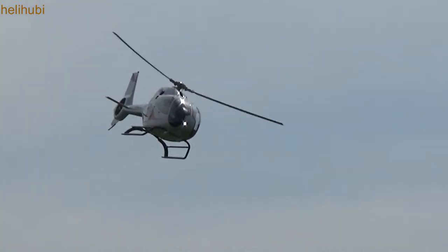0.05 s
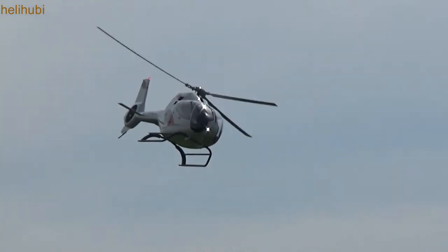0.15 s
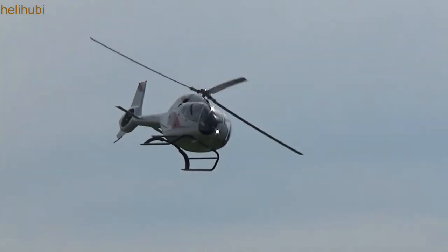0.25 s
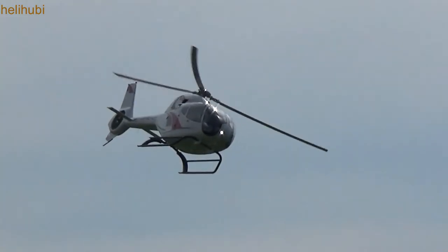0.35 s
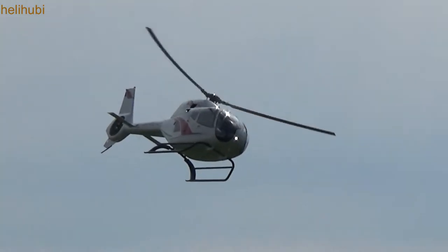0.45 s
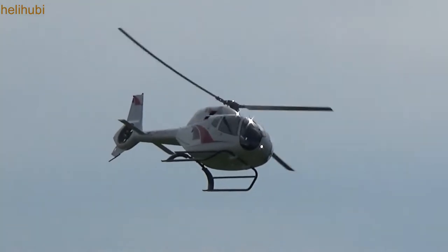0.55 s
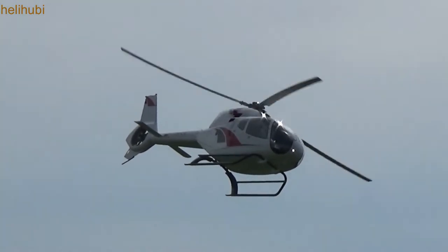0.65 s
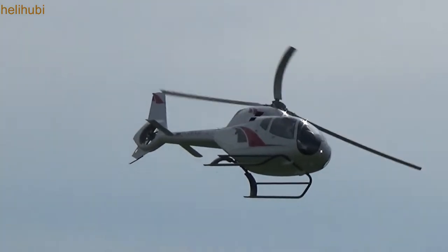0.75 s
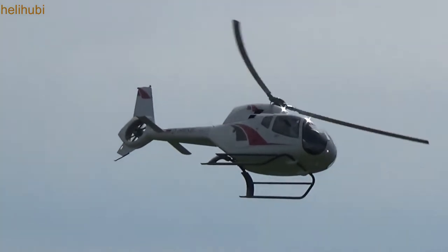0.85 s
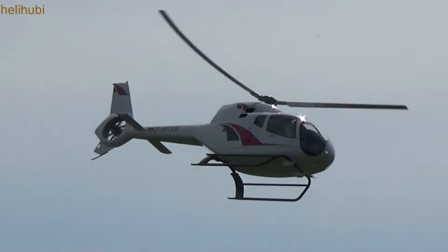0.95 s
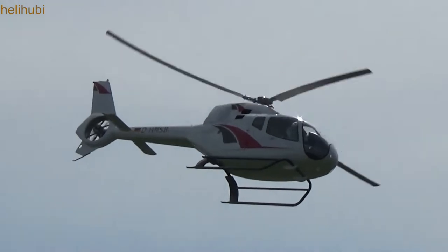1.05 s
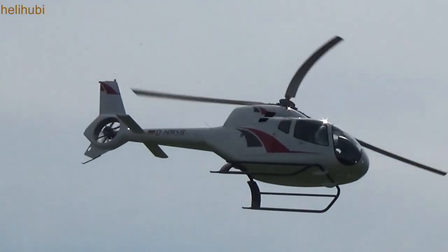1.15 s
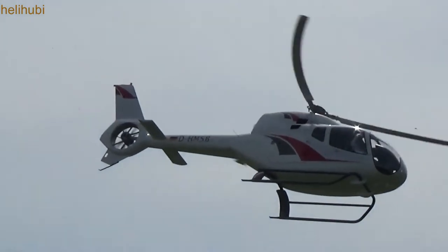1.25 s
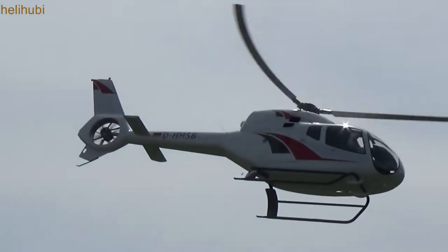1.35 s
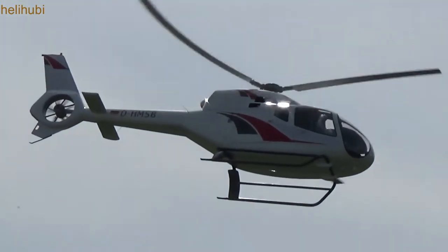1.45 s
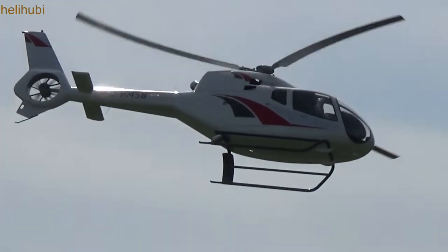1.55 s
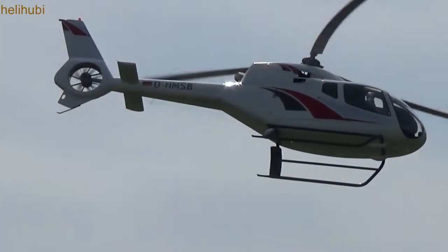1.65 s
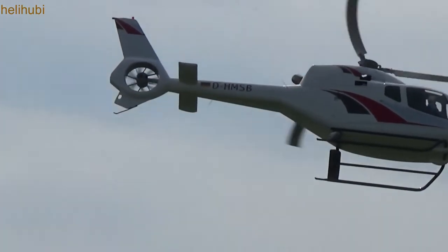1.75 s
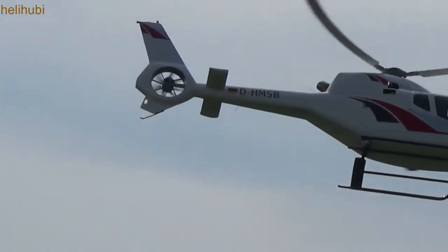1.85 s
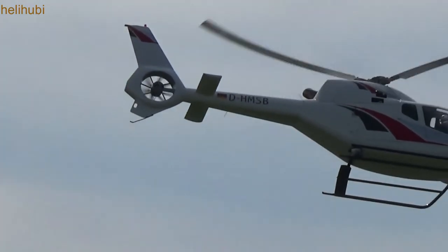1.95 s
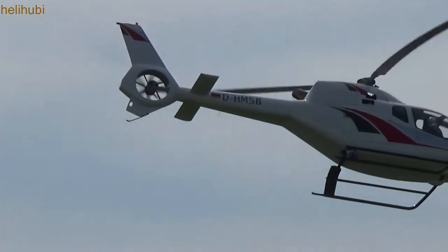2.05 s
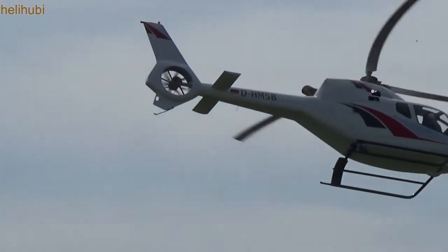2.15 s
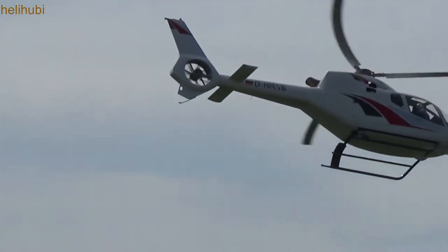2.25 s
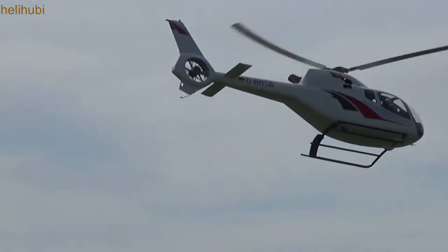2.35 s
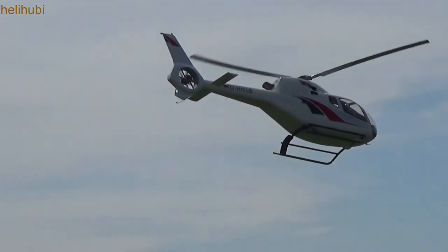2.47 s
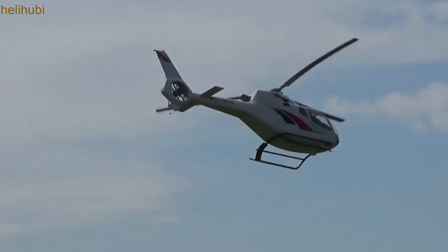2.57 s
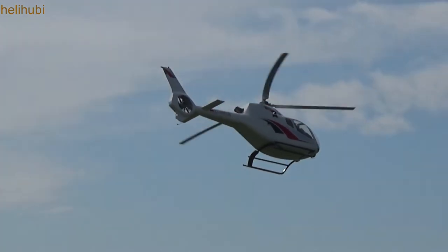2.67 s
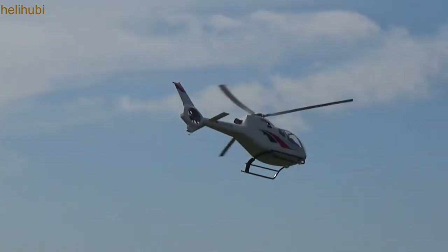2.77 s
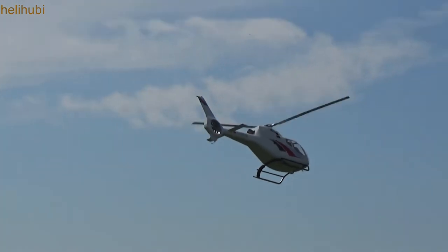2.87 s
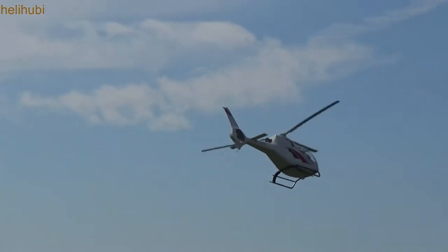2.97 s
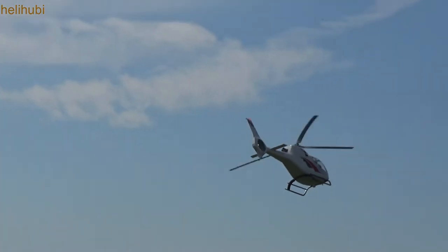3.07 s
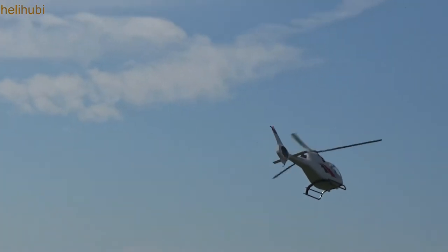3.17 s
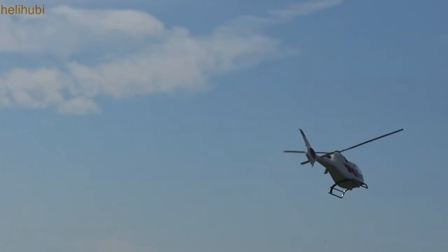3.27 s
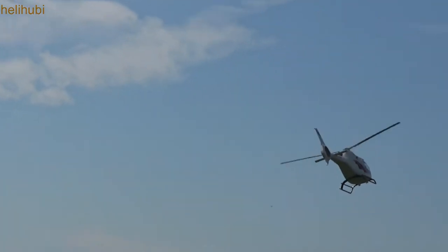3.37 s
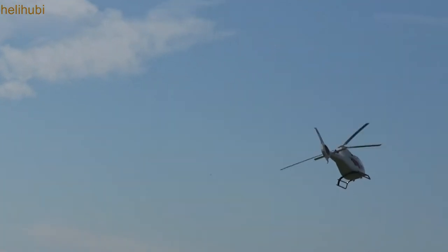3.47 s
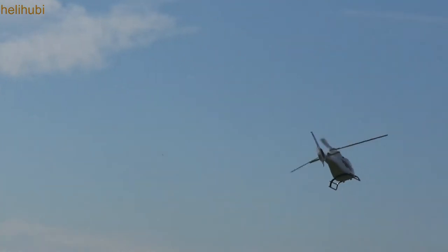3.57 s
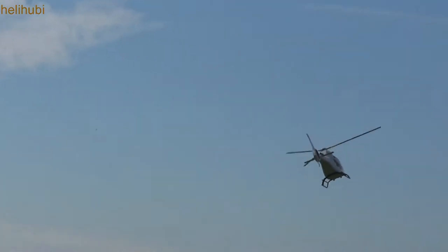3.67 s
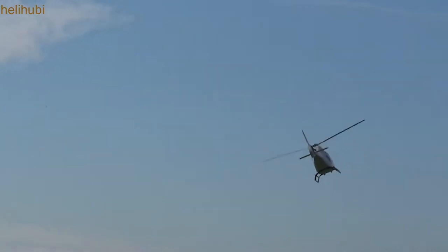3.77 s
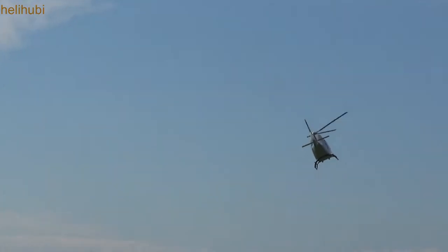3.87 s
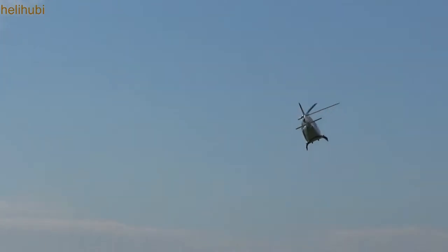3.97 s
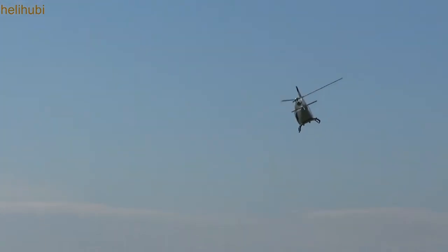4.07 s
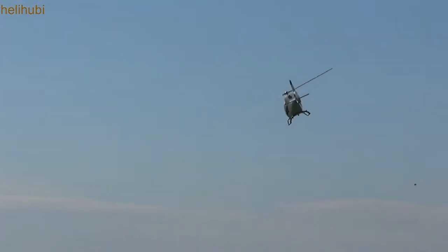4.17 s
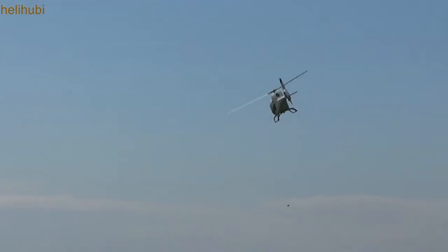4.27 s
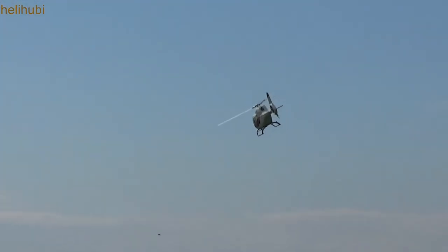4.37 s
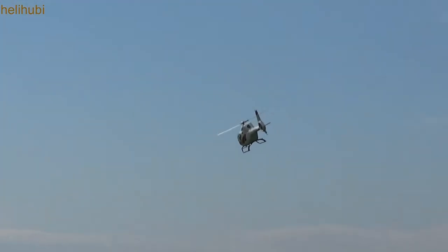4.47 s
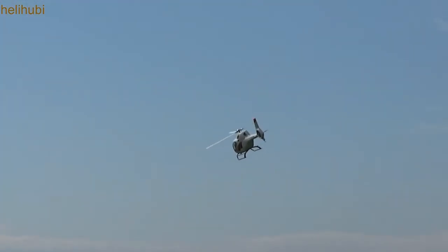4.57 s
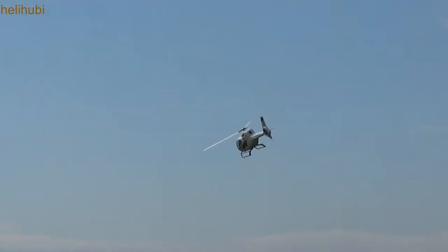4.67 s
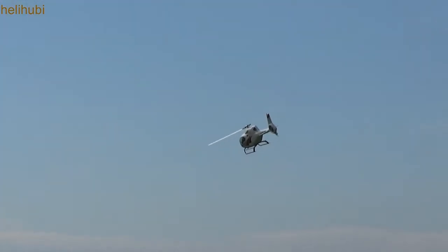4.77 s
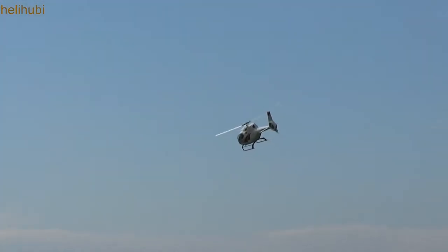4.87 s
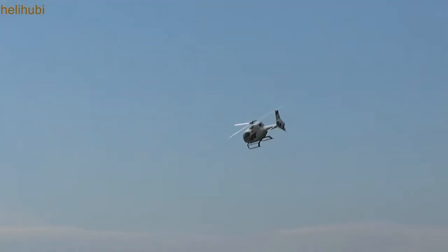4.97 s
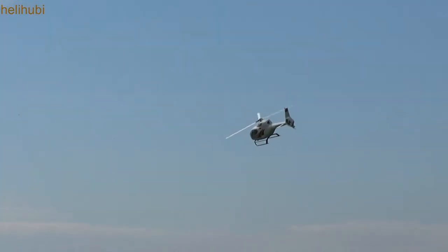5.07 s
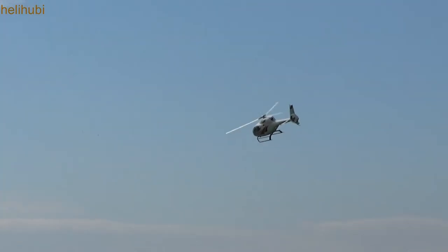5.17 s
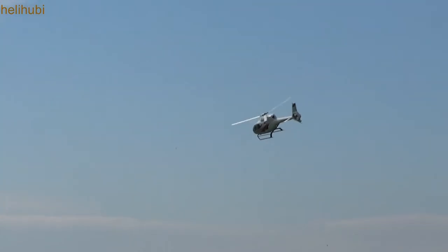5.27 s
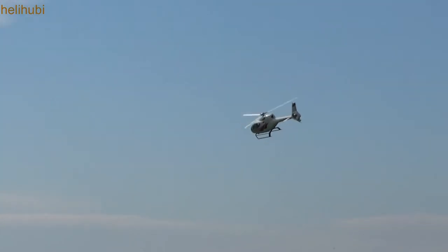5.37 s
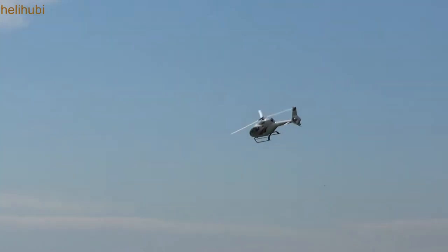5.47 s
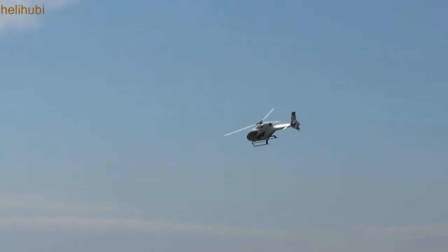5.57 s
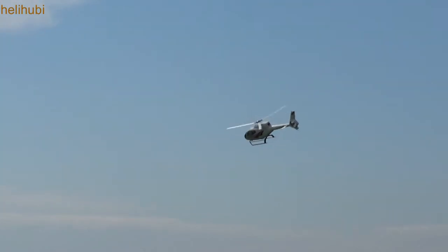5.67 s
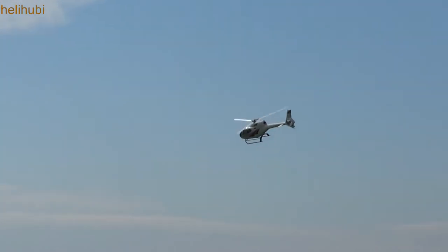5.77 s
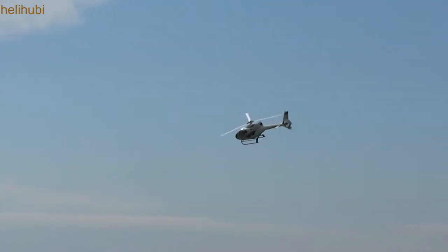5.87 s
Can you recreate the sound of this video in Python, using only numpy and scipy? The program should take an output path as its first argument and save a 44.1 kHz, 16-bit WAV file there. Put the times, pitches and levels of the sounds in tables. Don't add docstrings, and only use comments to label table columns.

```python
import sys
import numpy as np
from scipy import signal
from scipy.fft import rfft, irfft, next_fast_len
from scipy.io import wavfile
from scipy.ndimage import uniform_filter1d, map_coordinates

SR = 44100
rng = np.random.default_rng(int(sys.argv[2]) if len(sys.argv) > 2 else 0)


def transcribe(u):
    v = np.clip(np.atleast_2d(u).T, -1, 1)
    q = np.round(v * 32767).astype(np.int16)
    wavfile.write(sys.argv[1], SR, q)


def linear_from_db(decibels):
    return 10 ** (np.asarray(decibels, float) / 20)


N = 261513

# time in seconds, pitch in Hz.
HEARD_PITCH = [(0.0, 10207), (0.49, 10176), (0.8, 10151), (1.1, 10088), (1.48, 9976), (1.98, 9800),
               (2.35, 9653), (2.72, 9547), (3.1, 9474), (3.5, 9428), (3.8, 9417), (4.69, 9430),
               (5.19, 9454), (5.6, 9494), (5.93, 9505)]
# time in seconds, nearness in dB, intake in sight in dB.
FLIGHT = [(0, -5, 0.5), (.3, -4.5, 1.5), (.56, -1.5, 2), (1.5, 0, 0), (2.0, 1.2, 0), (2.5, 2.04, -3),
          (3.0, 1.15, -2), (3.3, -2.2, 2.5), (3.55, -3, 4.5), (3.7, -0.4, -2), (4.0, 0.8, -12.5),
          (4.35, -1.5, -7.5), (4.6, -6.5, -6.5), (4.85, -10.5, -9), (5.45, -6.5, -8), (5.6, -7.5, -1),
          (5.75, -6, -7.5), (5.93, -6.5, -12)]
# time in seconds, ground share from 0 to 1, blade thump in dB.
GROUND_AND_THUMP = [(0, 0.27, -55), (.7, 0.28, -50.5), (1.3, 0.13, -48.5), (2.1, 0.29, -48.5),
                    (3, 0.3, -45), (3.7, 0.47, -56), (4.4, 0.3, -60), (5, 0.25, -56), (5.93, 0.37, -50)]
# time in seconds, lag in ms.
GROUND_LAG = [(0, 1.8), (.6, 2.15), (1.3, 2.42), (1.8, 2.5), (2.4, 2.25), (3, 1.88), (3.4, 1.67),
              (3.8, 1.53), (4.4, 1.36), (5, 1.25), (5.93, 1.24)]

# frequency in Hz, level in dB relative
HISS_TONES = [(3334, -23), (3725, -21), (6667, -20), (8156, -22), (8334, -22)]
# frequency in Hz, level in dB.
GEAR_TONES = [(678, 0), (797, -3), (1357, -1), (3225, -4), (3262, -4), (4409, -6)]
# multiple of the blade rate, level in dB.
THUMP_HARMONICS = [(2, -10), (3, -4), (4, -4), (5, -3), (6, -4), (7, -7), (8, -7), (9, -11), (10, -13)]

# frequency in Hz, density in dB.
ROAR_COLOUR = [(90, -60), (135, -27), (200, -21), (287, -14.5), (363, -11), (450, -13.5), (617, 0.5),
               (780, -2), (956, -11), (1050, -18.5), (1360, -30.5), (2310, -90)]
RUSH_COLOUR = [(560, -34), (950, -10.5), (1090, -3), (1490, -4), (1710, -3), (2920, -4.5), (3500, -9),
               (4550, -43), (7700, -120)]
DUCT_COLOUR = [(600, -18.5), (950, -8), (1200, -2.5), (1450, -9), (1750, 1), (2080, -6.5), (2400, 1),
               (2760, -8.5), (3050, -5.5), (3500, -11.5), (4500, -30)]
JET_COLOUR = [(2060, -35), (3500, -5.5), (4850, -3.5), (5150, -5), (5500, -4.5), (7150, -34), (12100, -120)]
NOZZLE_COLOUR = [(3240, -25), (5500, -2.5), (5910, -3), (6410, 2.5), (7120, -0.5), (7800, -2.5),
                 (10100, -33), (17200, -120)]
HISS_COLOUR = [(7200, -33.5), (7900, -7.5), (8500, -4.5), (9500, -3.5), (10000, 3), (10500, -2),
               (11000, -4.5), (12200, -7), (13000, -12.5), (15500, -20.5), (16500, -23)]
# level in dB, share of nearness, share of intake sight,
# rise from behind in dB.
AIR_LAYERS = [
    (-32, 0.29, 0.0091, 3.5),
    (-25, 0.97, .01, -0.14),
    (-30.5, 0.95, 0.42, 1.4),
    (-30.5, 1, 0.36, -0.1),
    (-28, .99, 0.94, 0.5),
]

# centre in seconds, half width in seconds, rise in dB.
BLADE_BEAMS = [(.12, .12, 6.5), (.9, 0.12, 4.5), (1.4, 0.14, 5.5), (1.72, 0.16, 4), (2.1, 0.036, -10),
               (2.45, 0.26, 3), (2.85, 0.13, -0.5), (3.2, 0.11, -10), (3.52, 0.16, 3), (3.86, 0.037, 7),
               (3.96, 0.036, -10), (4.12, 0.086, 8), (4.28, 0.051, 8.5), (5.42, .06, -10), (5.63, 0.13, 5)]
TAIL_BEAMS = [(0, 0.091, 8), (.82, .15, 13), (1.06, .02, -6), (1.22, .3, 17), (1.6, .15, 8), (2.2, .1, 4),
              (2.8, .15, 7), (3.35, .1, 8), (3.65, 0.14, 6), (4.9, .15, -10), (5.38, .08, 7),
              (5.65, .15, 10)]
DRIVE_BEAMS = [(.25, 0.22, 12), (.55, 0.13, 10), (.97, .08, 12), (1.24, .1, 8), (1.65, .08, 6),
               (2.48, 0.071, 8), (2.76, .08, 7), (3.1, 0.22, 7), (3.66, .14, 13), (5.2, .2, -9)]
GEAR_BEAMS = [(1.1, 0.58, 14), (2.05, .3, 11.7), (2.7, 0.17, 4), (5, .5, 3.7)]
SHAFT_BEAMS = [(.55, 0.14, 12), (.85, 0.21, 10), (2.1, 0.16, 20), (2.8, .25, 4), (5, .5, 5.7)]
ROAR_BEAMS = [(1.5, 0.2, 0), (2.1, .15, 2), (3.1, 0.11, 2.5), (3.8, 0.26, 2.5)]
RUSH_BEAMS = [(2.1, 0.13, 2), (2.6, 0.11, 0), (5.6, 0.11, -0.5)]
JET_BEAMS = [(.3, 0.29, -1.5), (3.2, 0.14, 3), (3.55, .15, -4.5), (4.3, 0.14, 1)]
NOZZLE_BEAMS = [(.6, 0.095, 4), (1.7, .15, -0.5), (2.25, .12, 1.5), (3.25, 0.27, 5), (4.6, .2, 3.5),
                (5.75, 0.089, 3)]
TOP_BEAMS = [(.4, .7, -2.5), (2.2, .4, 2), (3.2, 0.39, 3), (5.5, .5, -2.5)]
# frequency in Hz, gain in dB.
TOP_COLOUR = [(10500, -38), (13000, 0)]

# start in seconds, length in seconds, start pitch in Hz,
# end pitch in Hz, width in Hz, level in dB.
WHISTLES = [
    (0, .3, 590, 570, 50, -39),
    (0.423, 0.43, 1760, 1730, 40, -39),
    (0.799, .55, 438, 377, 7.3, -50),
    (1.38, 0.28, 604, 584, 9, -34),
    (1.507, 0.66, 350, 339.4, 10, -41),
    (3.252, 0.3, 6250, 6500, 250, -31),
    (3.399, 0.5, 2870, 3095, 200, -32),
    (5.6, .2, 4350, 4370, 150, -40),
    (5.65, .28, 435, 427, 8.8, -44),
]
# frequency in Hz, gain in dB.
GRASS_COLOUR = [(100, 0), (2500, 0), (4500, -3), (7000, -10), (9000, -20), (16000, -30)]
# frequency in Hz, gain in dB.
SCATTER_COLOUR = [(100, -15), (250, -24), (600, -20), (1300, -20), (2200, -21), (3000, -19), (4200, -22),
                  (5300, -19), (6200, -25), (7500, -18), (9000, -25), (10300, -26), (11200, -36),
                  (15000, -45)]
# frequency in Hz, density in dB.
FIELD_COLOUR = [(15, -22), (40, -14), (65, -12), (100, -8), (160, 1), (300, -1), (600, -8), (1500, -40)]

REST_HZ, BLADE_HZ = 10000, 43.25
SHAFT_HZ, TAIL_HZ, DRIVE_HZ = REST_HZ / 6, 3051, 6519
BLADE_DB, TAIL_DB, DRIVE_DB, GEAR_DB, SHAFT_DB = 3, -46.5, -47, -52.5, -49.5
FADE, FADE_RATE = 0.33, 14
NEARING_HZ, LEAVING_HZ = 10215, 9415
DUCT_TURN = 0.33
CHOP_AFT, CHOP_OPEN = 0.26, 0.46
GROUND_TURN = -1.2
WIDE_DB, WIDE_DB_PER_MS = 8.5, -2.5
PAN_DB, PAN_AFT_DB = -0.35, -0.55
FIELD_DB, HUM_HZ, HUM_DB = -51.5, 49, -67


def level(x):
    return x / np.sqrt(np.mean(x ** 2))


def walk(rate):
    steps = np.repeat(rng.standard_normal(int(N / SR * rate) + 2), 8)
    steps = uniform_filter1d(steps, size=8)
    return 0.95 * np.interp(np.arange(N) * rate * 8 / SR, np.arange(len(steps)), steps)


def curves(table):
    s, *columns = np.transpose(table)
    return [np.interp(np.arange(N) / SR, s, c) for c in columns]


def beams(table):
    t = np.arange(N) / SR
    return sum(db * np.exp(-((t - s) / half) ** 2) for s, half, db in table)


def colour(x, table):
    hz, db = np.transpose(table)
    f = np.fft.rfftfreq(len(x), 1 / SR) + 1
    gain = linear_from_db(np.interp(np.log(f), np.log(hz + 1), db))
    return irfft(rfft(x) * gain, len(x))


def read(x, place):
    return map_coordinates(x, [place], order=3, mode="wrap")


def tone(hz, clock, waver_db, rate, drift):
    phase = 2 * np.pi * hz * clock + drift * walk(rate)
    return np.sqrt(2) * linear_from_db(waver_db * walk(rate)) * np.sin(phase)


def turbulence(table, place, flicker_db, rate, count):
    size = next_fast_len(N)
    bins = rfft(colour(rng.standard_normal(size), table))
    edges = np.geomspace(max(table[0][0], 150), table[-1][0], count + 1) * size / SR
    band = np.searchsorted(edges[1:-1], np.arange(len(bins)))
    total = np.zeros(N)
    for k in range(count):
        total += linear_from_db(flicker_db * walk(rate)) * irfft(bins * (band == k), size)[:N]
    return level(read(total, place))


def blade_swell(clock, sharp):
    return np.exp(sharp * (np.cos(2 * np.pi * BLADE_HZ * clock) - 1))


def chop(clock, depth, sharp):
    gain = 1 + depth * linear_from_db(3 * walk(7)) * blade_swell(clock, sharp)
    return gain / uniform_filter1d(gain, size=8000)


def compressor_whine(clock, sweep):
    blade = (1 + FADE * walk(FADE_RATE)) * tone(REST_HZ, clock, 2.0, 22, 0.9)
    flash = sweep * blade_swell(clock, 9)
    blade += linear_from_db(-5.5) * flash * tone(REST_HZ + 2 * BLADE_HZ, clock, 3.8, 8.3, 2.9)
    skirt = level(uniform_filter1d(rng.standard_normal(N), size=300))
    return blade + linear_from_db(-9.5) * skirt * tone(REST_HZ, clock, 0, 30, 2.6)


def turbine(clock, sweep, hiss_db, near_db):
    whine = linear_from_db(hiss_db + BLADE_DB + beams(BLADE_BEAMS)) * compressor_whine(clock, sweep)
    orders = sum(linear_from_db(db) * tone(hz, clock, 3, 8, 1.1) for hz, db in HISS_TONES)
    gears = sum(linear_from_db(db) * tone(hz, clock, 3, 9, 1.1) for hz, db in GEAR_TONES)
    gears = linear_from_db(GEAR_DB + beams(GEAR_BEAMS)) * gears
    shaft = linear_from_db(SHAFT_DB + beams(SHAFT_BEAMS)) * tone(SHAFT_HZ, clock, 2.8, 14, 1.1)
    tail = linear_from_db(near_db + TAIL_DB + beams(TAIL_BEAMS)) * tone(TAIL_HZ, clock, 2.2, 18, 0.7)
    drive = linear_from_db(near_db + DRIVE_DB + beams(DRIVE_BEAMS)) * tone(DRIVE_HZ, clock, 2.8, 18, 1.0)
    return whine + linear_from_db(hiss_db) * orders + gears + shaft + tail + drive


def exhaust_roar(clock, sweep):
    roar = turbulence(ROAR_COLOUR, clock * SR, 0.67, 8, count=4) * chop(clock, 1.0 * sweep, 11.0)
    return colour(roar, [(60, -20), (150, -8.5), (250, 0.5)])


def duct_rush(clock, ring, sweep):
    ringing = np.sqrt(ring) * turbulence(DUCT_COLOUR, clock * SR, 1.67, 5.76, count=5)
    plain = np.sqrt(1 - ring) * turbulence(RUSH_COLOUR, clock * SR, 0.89, 5.5, count=3)
    return (ringing + plain) * chop(clock, 0.5 * sweep, 5)


def compressor_hiss(clock, sweep):
    hiss = turbulence(HISS_COLOUR, clock * SR, 1.0, 20, count=5)
    return linear_from_db(7.5) * linear_from_db(0.8 * walk(22)) * hiss * chop(clock, 0.25 * sweep, 3)


def airflow(clock, ring, sweep, levels_db):
    roar_db, rush_db, jet_db, nozzle_db, hiss_db = levels_db
    place = clock * SR
    jet = turbulence(JET_COLOUR, place, 1.1, 11, count=3) * chop(clock, 0.2 * sweep, 3)
    nozzle = turbulence(NOZZLE_COLOUR, place, 2.6, 6, count=3) * chop(clock, 0.32 * sweep, 3)
    air = linear_from_db(roar_db + beams(ROAR_BEAMS)) * exhaust_roar(clock, sweep)
    air += linear_from_db(rush_db + beams(RUSH_BEAMS)) * duct_rush(clock, ring, sweep)
    air += linear_from_db(jet_db + beams(JET_BEAMS)) * jet
    air += linear_from_db(nozzle_db + beams(NOZZLE_BEAMS)) * nozzle
    air += linear_from_db(hiss_db) * compressor_hiss(clock, sweep)
    air *= linear_from_db(0.65 * walk(7))
    return air + (linear_from_db(beams(TOP_BEAMS)) - 1) * colour(air, TOP_COLOUR)


def rotor(clock, thump_db):
    thump = sum(linear_from_db(db) * tone(k * BLADE_HZ, clock, 1.8, 2.5, 0.4) for k, db in THUMP_HARMONICS)
    return linear_from_db(thump_db) * level(thump)


def whistles():
    out = np.zeros(N)
    for start, length, from_hz, to_hz, width_hz, db in WHISTLES:
        a, n = int(start * SR), int(length * SR)
        flutter = uniform_filter1d(rng.standard_normal(SR), size=int(SR / width_hz))
        flutter = level(flutter)[:n]
        glide = np.sin(2 * np.pi * np.cumsum(np.linspace(from_hz, to_hz, n)) / SR)
        whistle = linear_from_db(db) * np.sqrt(np.hanning(n)) * (1 + 0.5 * flutter) * glide
        out[a:a + n] += whistle[:N - a]
    return out


def add_ground_path(air, share, lag_ms):
    analytic = signal.hilbert(colour(air, GRASS_COLOUR), next_fast_len(N))[:N]
    bounce = np.real(analytic * np.exp(1j * GROUND_TURN))
    bounce = read(bounce, np.arange(N) - (lag_ms + 0.015 * walk(5)) * SR / 1000)
    share = np.clip(share, 0, 1)
    return (air + share * bounce) / np.sqrt(1 + share ** 2)


def scatter(mid, lag_ms):
    spray = rng.standard_normal(9000) * np.hanning(9000) ** 2
    echoes = signal.fftconvolve(mid, spray / np.linalg.norm(spray), mode="same")
    return colour(echoes, SCATTER_COLOUR) * linear_from_db(WIDE_DB + WIDE_DB_PER_MS * lag_ms)


def field_rumble():
    return linear_from_db(FIELD_DB) * level(colour(rng.standard_normal(N), FIELD_COLOUR))


def hum():
    return linear_from_db(HUM_DB) * tone(HUM_HZ, np.arange(N) / SR, 1.5, 2.5, 0.3)


def scene():
    near_db, sight_db = uniform_filter1d(curves(FLIGHT), size=3500)
    lag_ms = uniform_filter1d(curves(GROUND_LAG)[0], size=9000)
    ground_share, thump_db = curves(GROUND_AND_THUMP)
    pitch = uniform_filter1d(curves(HEARD_PITCH)[0], size=11000)
    clock = np.cumsum(pitch / REST_HZ) / SR
    aft = np.clip((NEARING_HZ - pitch) / (NEARING_HZ - LEAVING_HZ), 0, 1)
    ring = 1 - np.exp(-2 * (1 - aft) / DUCT_TURN)
    sweep = CHOP_AFT + CHOP_OPEN * ring
    levels_db = [db + near * near_db + sight * sight_db + aft_db * aft
                 for db, near, sight, aft_db in AIR_LAYERS]
    air = airflow(clock, ring, sweep, levels_db)
    mid = add_ground_path(air, ground_share, lag_ms)
    mid = mid + turbine(clock, sweep, levels_db[-1], near_db)
    mid = mid + rotor(clock, thump_db) + whistles() + field_rumble()
    side = scatter(mid, lag_ms)
    mid = mid + hum()
    pan_db = PAN_DB + PAN_AFT_DB * aft
    return np.array([mid * linear_from_db(pan_db / 2) + side, mid * linear_from_db(-pan_db / 2) - side])


def top_cut(x):
    return signal.sosfilt(signal.butter(12, 15700, fs=SR, output="sos"), x)


def record(dry):
    response = [(15, -20), (30, -20), (45, -7), (65, -8.0), (100, -0.5), (16000, 0.5)]  # (Hz, dB)
    thin = np.array([colour(x, response) for x in dry])
    return top_cut(thin)


dry = scene()
out = record(dry)
transcribe(out)
```